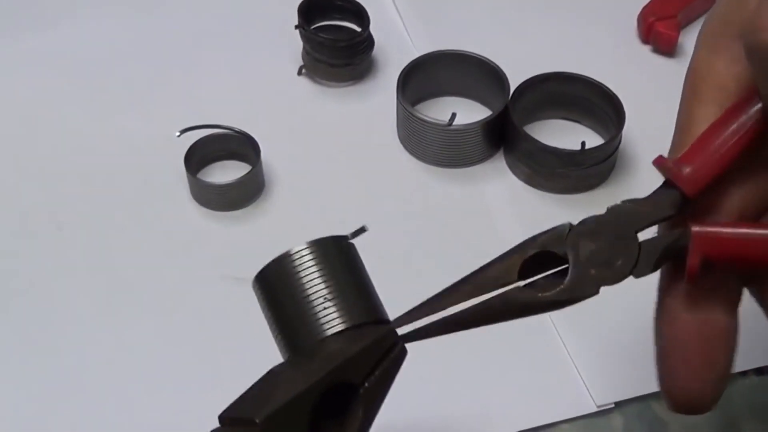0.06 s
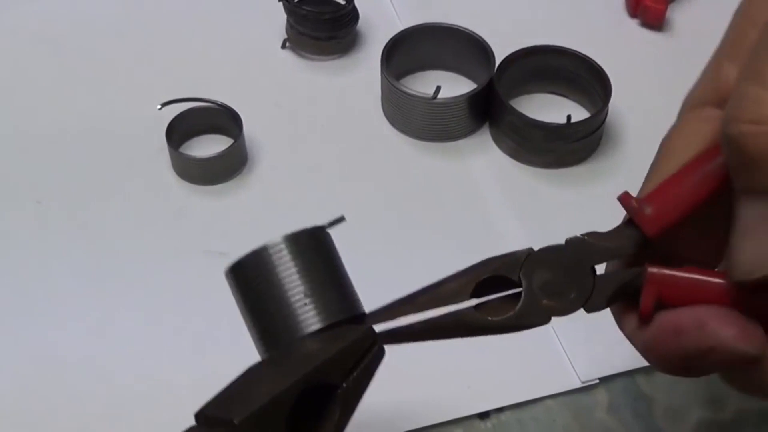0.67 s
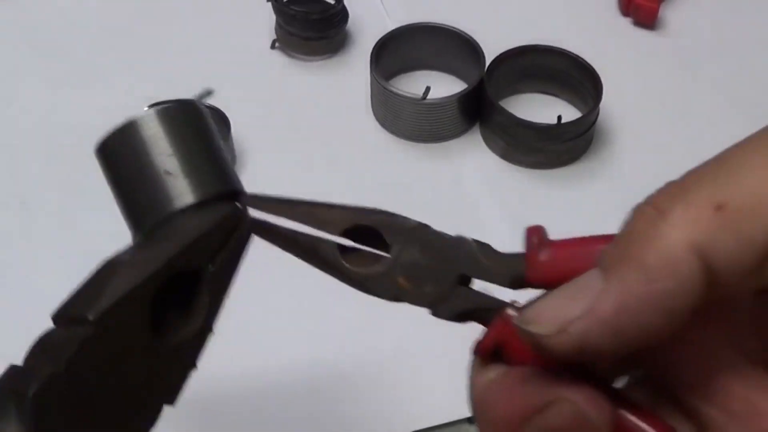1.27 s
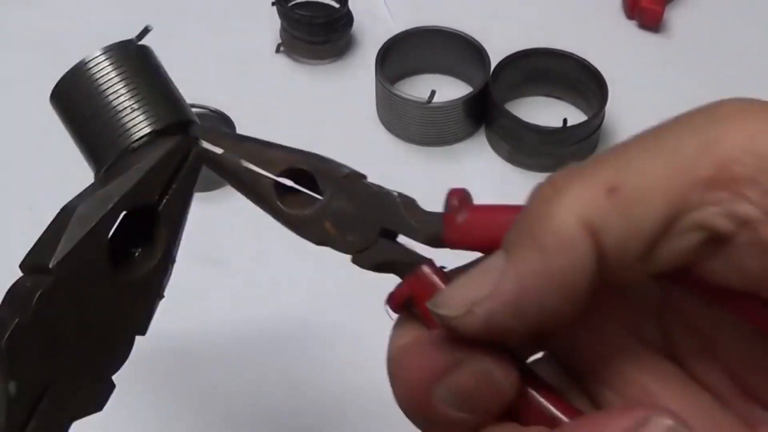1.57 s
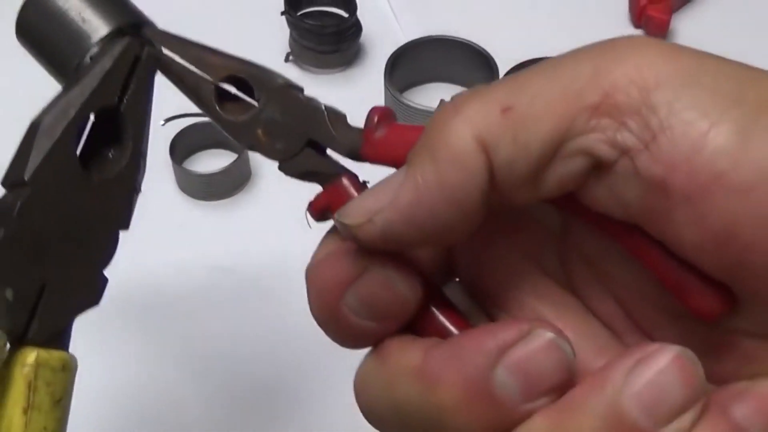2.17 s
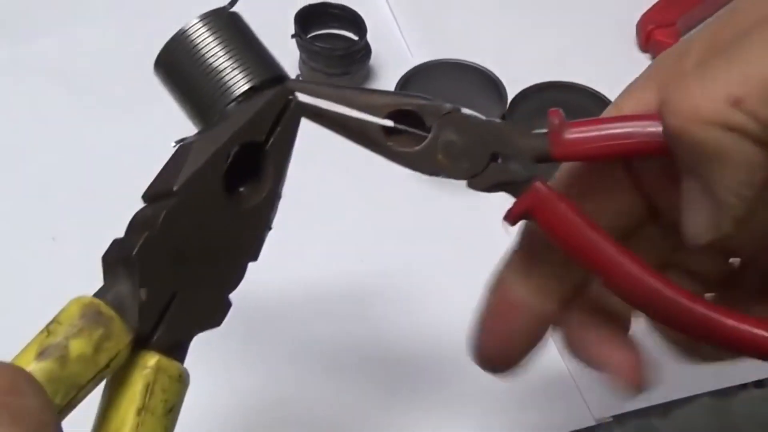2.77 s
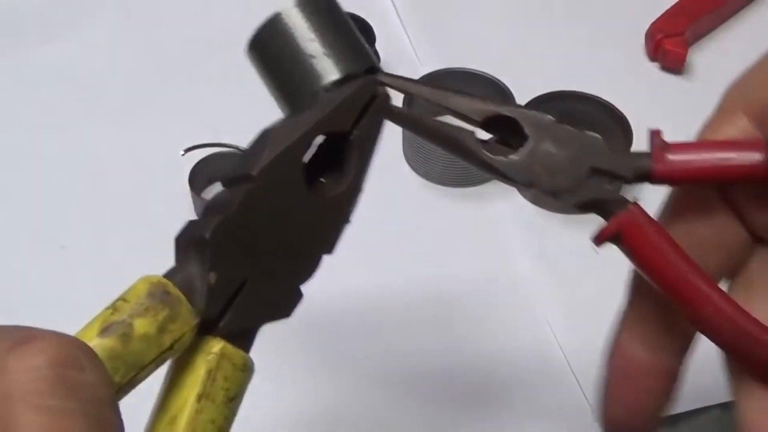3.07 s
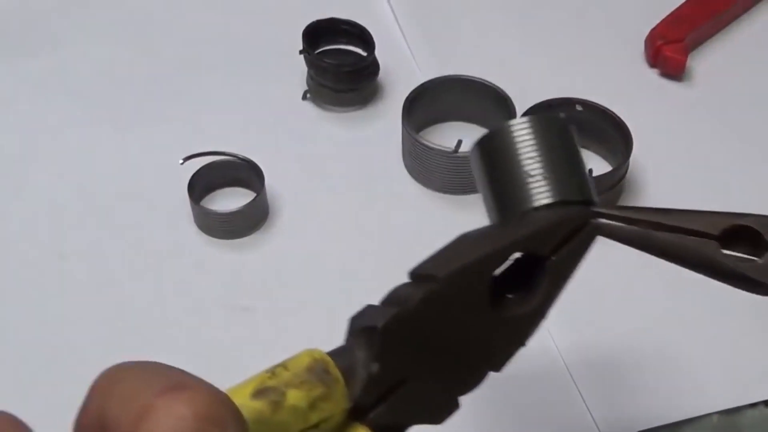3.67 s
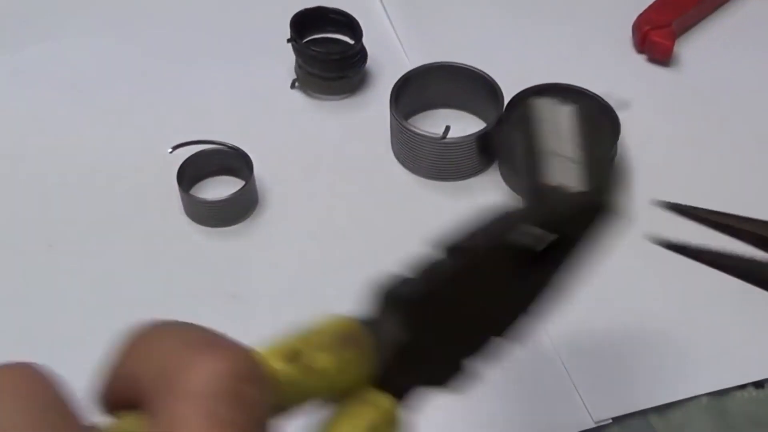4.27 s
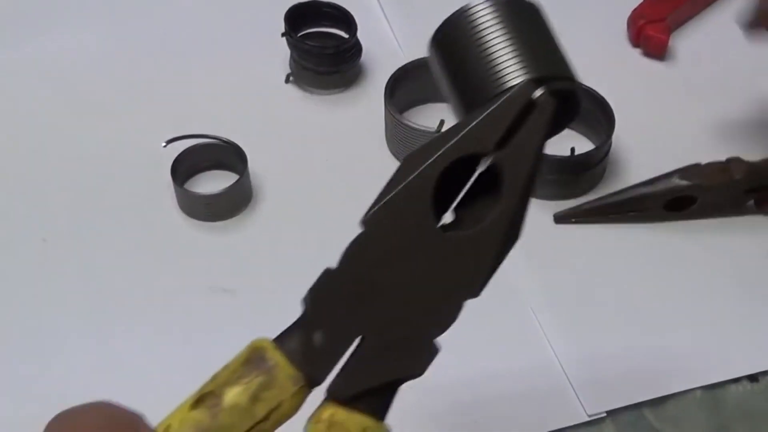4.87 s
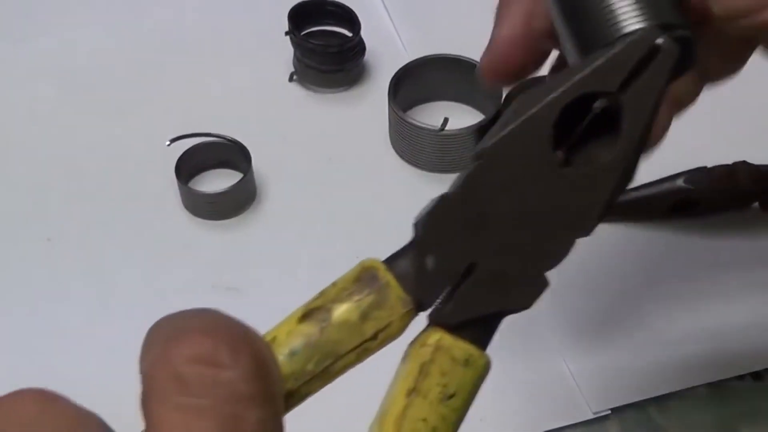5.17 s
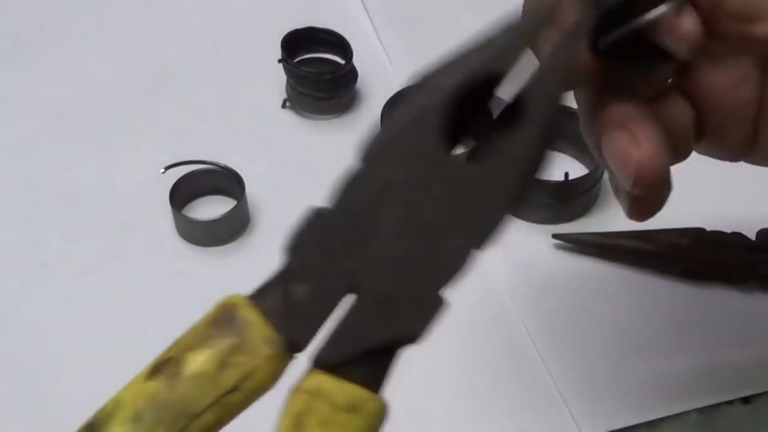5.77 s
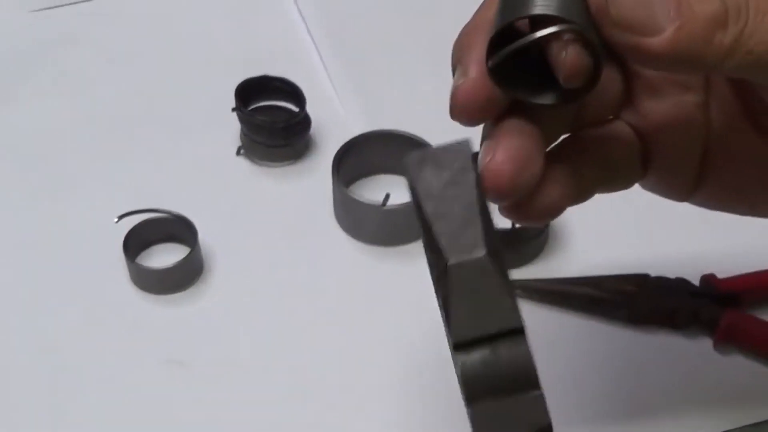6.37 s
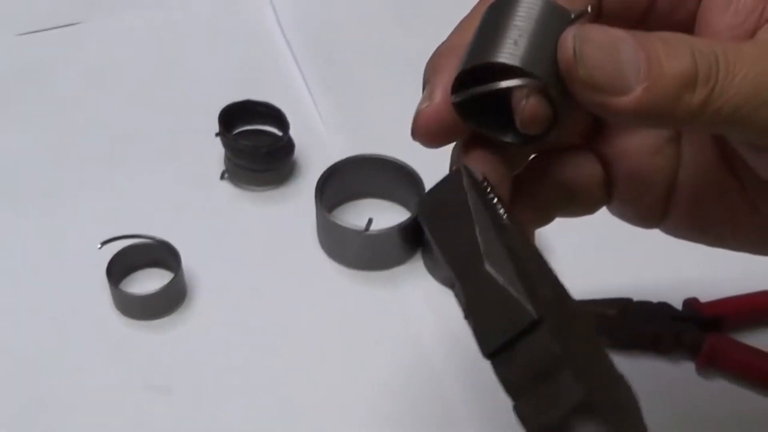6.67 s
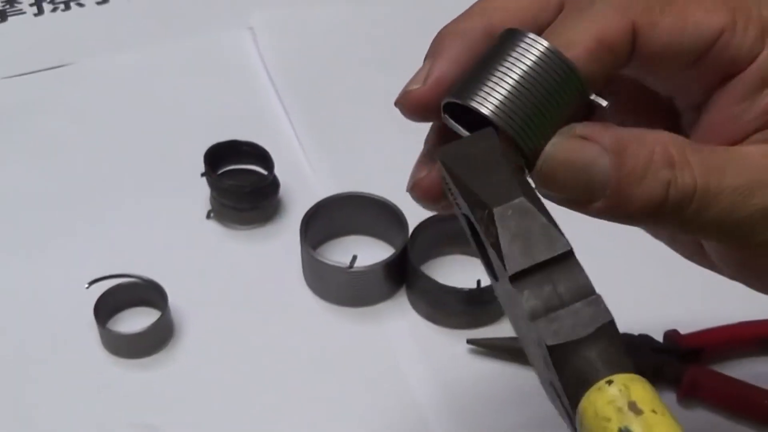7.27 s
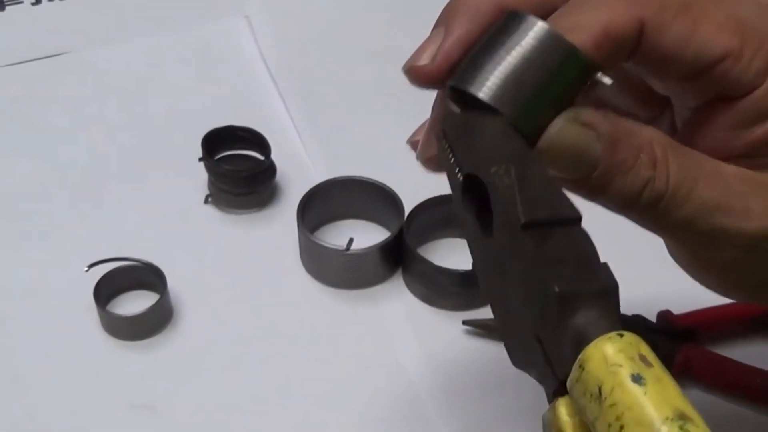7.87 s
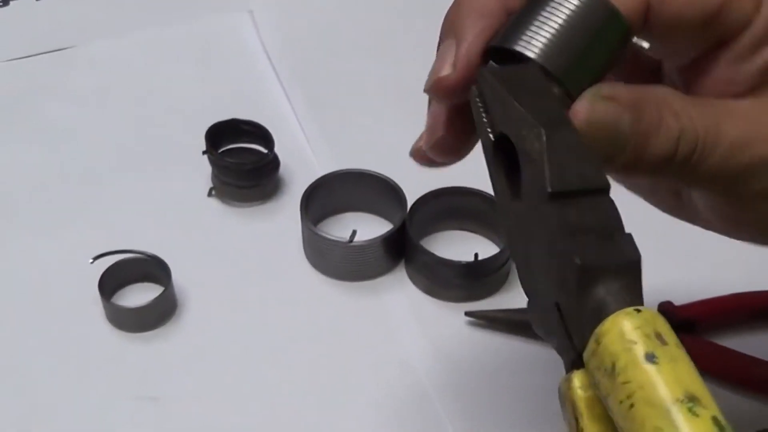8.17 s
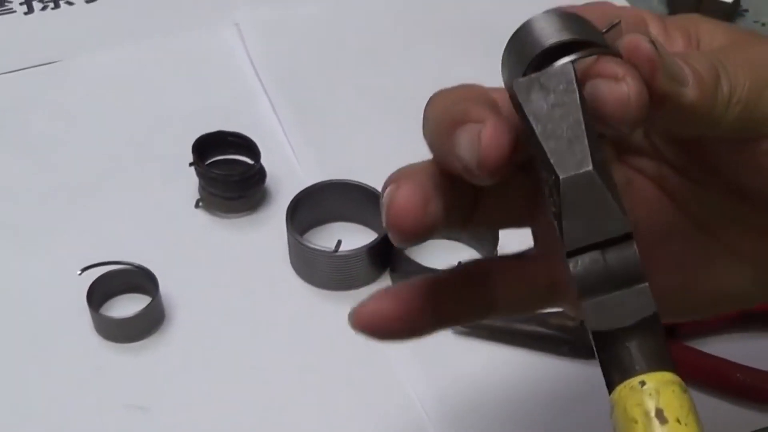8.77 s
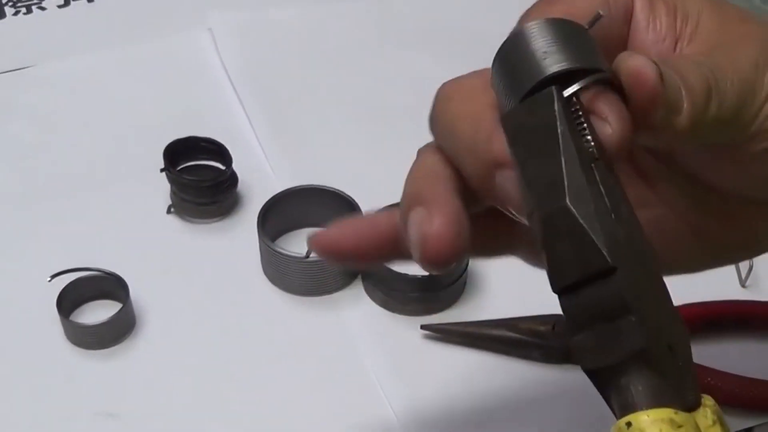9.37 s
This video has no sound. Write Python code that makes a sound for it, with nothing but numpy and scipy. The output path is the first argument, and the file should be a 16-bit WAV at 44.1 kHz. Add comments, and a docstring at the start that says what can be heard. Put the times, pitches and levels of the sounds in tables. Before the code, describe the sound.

Pliers grip and bend the end of a coiled steel spring, heard close in a small room. Tiny squeaky scrapes and a few light metallic clicks open the first second. From about 1 to 2.2 seconds the clicks come thick and irregular, some sharp and doubled, as the wire slips and catches in the jaws. Scattered clicks follow, clearer near 3.1, 3.5 and 4.1 seconds. At 4.4 seconds the jaws skid off with a loud, bright snap and a very short ring from the coil. At about 5 seconds one pair of pliers lands on the workbench with a clattering thump, then knocks again at 5.5. Soft scrapes follow until 6 seconds, then only sparse faint ticks and brief rasps until about 9.5. Quiet, steady room hiss and hum and the faint, high, fluttering whine of a small motor run throughout.

```python
"""Two pairs of pliers grip and bend the end of a coiled steel spring on a workbench. By stick-slip
friction the wire creeps, slips and catches in the jaws; the short clicks and scrapes excite the modes
of jaws and coil, until the jaws skid off. One pair is put down, and its impacts ring the bench top.
Behind it are the steady air of a small room and the faint fluttering whine of a small motor,
probably a camera's."""
import sys
import numpy as np
from scipy import signal
from scipy.fft import rfft, irfft, next_fast_len
from scipy.io import wavfile
from scipy.ndimage import uniform_filter1d

SR = 44100
rng = np.random.default_rng(int(sys.argv[2]) if len(sys.argv) > 2 else 0)


def digitize_waveform(pressure):
    """Quantize a signal to 16-bit integers and store it at the path in sys.argv[1].

    Rows of a 2-D input are taken as channels; values are limited to [-1, 1].
    """
    field = np.atleast_2d(pressure).T
    bounded = np.clip(field, -1, 1)
    quanta = np.round(bounded * 32767).astype(np.int16)
    wavfile.write(sys.argv[1], SR, quanta)


N = 419391
TAPS = 2048  # length of the colouring filters
HZ = np.fft.rfftfreq(TAPS, 1 / SR)

# Spectrum of the room air. Each row: frequency in Hz, relative level in dB.
AIR_SPECTRUM = [(15, -54), (30, -29), (50, -20.5), (100, -21), (150, -20.5), (185, -5.5), (285, -3.5),
                (400, -3.5), (560, -5), (900, -9), (1500, -12), (3000, -15.5), (6000, -21), (14800, -24.5),
                (16000, -30)]
# Coherence of the air between channels. Each row: frequency in Hz, correlation from 0 to 1.
AIR_COHERENCE = [(60, 0.99), (130, 0.99), (290, 0.97), (640, 0.83), (1410, 0.49), (3100, 0.28), (6820, 0.9),
                 (15000, 1.0)]
# Narrow drones. Each row: frequency in Hz, width in Hz, height above the air in dB.
AIR_DRONES = [(60.8, 20, 13), (118, 25, 16), (196, 16, 2), (359, 13, 5), (556.4, 13, 9.5), (650.4, 12, 7.5),
              (884, 23, 7.5), (1213, 29, 6.5)]
# Phase lead of the left channel, for air and bench work. Each row: frequency in Hz, lead in radians.
AIR_PHASE = [(300, 0), (1500, 0.47), (3200, .5), (5000, 0.15), (8000, 0)]
BENCH_PHASE = [(60, .1), (250, 0.23), (500, 0.71), (900, 0.58), (1800, 0.44), (4500, 0.52), (9000, 0.2)]
# Held states of the motor. Each row: start in seconds, pitch in Hz, level in dB.
WHINE_STEPS = [(0, 2570, -73), (1.55, 3280, -72), (3.75, 2570, -75), (5.62, 3290, -70)]
# Steel sliding on steel. Each row: start in seconds, length in seconds, level in dB, squeak pitch
# in Hz, squeak height above the rasp in dB.
SLIDES = [(.277, .04, -52.5, 4420, 19), (.473, 0.047, -48.5, 4390, 19), (.885, 0.057, -61, 5300, 6),
          (1.101, .11, -59.5, 2400, 16), (2.47, 0.051, -59.5, 10830, 11), (2.958, .08, -61.5, 11890, 8),
          (4.104, .1, -63, 6000, 11), (4.821, 0.14, -56, 11460, 9), (5.281, .11, -72, 12400, 17),
          (5.561, .071, -60, 12300, 11), (5.615, .091, -55, 11000, 8), (5.723, .04, -50.5, 5300, 15),
          (5.899, .15, -65, 12400, 13), (7.315, 0.024, -58.5, 4110, 19), (7.501, .022, -58, 4170, 19),
          (8.103, 0.076, -57.5, 12500, 11), (8.343, .038, -60.5, 7460, 14), (8.509, .075, -63.5, 6170, 12),
          (8.67, 0.058, -61.5, 7200, 11), (8.88, .03, -55.5, 4230, 14)]
# Slips of the wire. Each row: start in seconds, level in dB as if spread over 1 ms, chatter decay in
# seconds, body gain in dB, treble gain in dB, favoured resonance in Hz, coil share from 0 to 1,
# delay in seconds until the next tooth catches (0 if none does).
SLIPS = [(.3006, -37, 0.0021, 3, -1, 4430, 0.23, .008), (.4588, -37, .0003, 7, -3, 3320, .6, 0.00005),
         (.6897, -27, .0002, -2, -3.5, 7000, 0.23, 0.000089), (.7605, -36.5, .0003, -2, -5, 4310, 0, 0),
         (.9521, -41, .0005, 7, -3, 5770, 0.04, 0), (.964, -33.5, .0006, 2.5, 1, 5080, 0.54, 0),
         (1.0705, -36, .002, -1, -2, 2500, .3, 0), (1.08, -31, 0.00047, -6, -7, 4330, .1, 0),
         (1.112, -36.5, 0.0022, 0, -2, 2330, .4, 0), (1.131, -29.5, 0.00048, 3, 2, 2800, 0.13, .0045),
         (1.166, -37.5, .0012, 4, 3, 2730, 0, .01), (1.1977, -23.5, 0.00064, 4.5, 5, 3530, 0.18, .0036),
         (1.2675, -42, .0009, -1, 2, 2150, 0, 0), (1.2844, -29.5, 0.0014, 6, 1, 3500, 0.08, 0.0082),
         (1.2944, -22.5, .0006, 2, 2.5, 2250, 0.1, .0035), (1.3615, -27, .001, 4, 5, 2130, .1, 0),
         (1.3678, -25.5, 0.00066, 0, -4, 3420, .03, 0.0016), (1.4265, -39, .0005, 2, -8, 2410, .2, 0),
         (1.4413, -26.5, .0016, 4.5, 0.5, 9200, 0.12, .0068), (1.5154, -40.5, 0.0043, 3, -2, 2130, .2, 0),
         (1.5354, -35.5, .0006, -3, -5, 2500, .05, .0037),
         (1.6038, -22.5, 0.0022, 2.5, 2, 3960, .05, .0028), (1.65, -42, .0005, -4, 3, 8610, .1, 0),
         (1.8403, -40, .0005, -3, 1, 2500, 0.14, 0), (1.8882, -28.5, 0.00054, 0.5, 4.5, 2550, 0.11, 0.0034),
         (2.0041, -45.5, .0004, 7, 6, 8785, 0.14, 0), (2.0568, -45.5, .0004, 3, 7, 2670, 0, 0),
         (2.103, -43, .001, 10, 8, 9300, 0, 0), (2.1186, -36, .0004, 4, 3, 2500, .05, 0),
         (2.1395, -23, .003, 2.5, 3.5, 1900, 0.13, .008), (2.431, -42.5, .0004, 3, 8, 10200, 0.4, 0.00016),
         (2.5175, -41.5, 0.00051, -11, 10, 11900, 0, 0.00015),
         (2.573, -42.5, .0007, 2, -14, 2330, 0.3, 0.00015), (2.8795, -47, .0003, -8, 2, 5340, 0, 0),
         (2.9915, -43.5, .0003, 15, -9, 3360, .3, 0), (3.0556, -27, .0016, 1, -1, 12640, .5, 0.00011),
         (3.0945, -33, 0.0013, 2.5, -5, 2270, .05, 0.00025),
         (3.5153, -25, 0.00089, 0.5, -2, 12240, 0.6, 0.004), (3.595, -30, .0037, 4, -3.5, 11640, .45, 0),
         (3.6715, -41, .0015, 4, -4, 4310, 0.93, 0), (4.0897, -29.5, .0012, -3, 3, 11400, 0.26, 0.00016),
         (4.324, -41, .0005, -8, -5, 9470, .5, 0), (4.4197, -14.5, .0018, -18, -0.5, 11990, .3, 0),
         (4.8217, -42, .0007, 10, 6, 1790, .6, 0), (5.64, -41, 0.00038, -4, 12, 11100, 0, 0),
         (5.9456, -37, .0022, 3, -9, 5405, .5, 0), (6.3393, -43.5, .0008, 2, -5, 2140, .3, 0),
         (7.2135, -37, .0003, 8, -16, 3530, .2, 0), (7.5168, -44.5, .0011, 5, -4, 4130, .3, 0),
         (7.6794, -46, .0014, -7, -3, 11110, .3, 0), (7.978, -43, 0.00073, 9, 4, 7500, 0.13, 0.00031),
         (8.6775, -42.5, 0.0018, -20, -6, 7240, .3, 0.0002),
         (8.917, -36, .0013, 2.5, -1.5, 6370, .45, 0.00063), (9.3586, -44.5, .0013, -3, 1, 5510, .4, .011)]
# Density of faint ticks as the wire twists. Each row: time in seconds, mean ticks per second.
TICK_DENSITY = [(0, 2), (1, 8), (1.7, 5), (2.2, 2), (2.8, 5), (3.6, 4), (4.5, .5), (9.5, .4)]
# Pliers landing on the bench, levels as if spread over 1 ms. Each row: start in seconds, thump level
# in dB, thump centre in Hz, clack level in dB, clack centre in Hz, steel tick level in dB.
LANDINGS = [(4.9706, -9.6, 480, -15, 2660, -30), (4.981, -17.5, 530, -31, 2200, -33.5),
            (5.0257, -39, 450, -19.5, 4630, -18.5), (5.0280, -15.5, 470, -21, 1400, -42),
            (5.0585, -32.5, 300, -30, 4130, -38), (5.458, -36, 700, -37, 1930, -30),
            (5.4625, -11, 766, -11, 1880, -24), (5.4823, -19.5, 664, -37, 1190, -43)]
# Modes of the clamped jaws, the held coil and the bench top. Each row: frequency in Hz, width in Hz,
# relative peak level in dB.
JAW_RESONANCES = [(1130, 590, 2), (2190, 330, 5.5), (2930, 190, 7), (3850, 860, -3.5), (5850, 950, 0),
                  (6400, 270, 4), (8700, 600, 9.5), (10500, 500, 7)]
COIL_MODES = [(1050, 70, -7), (1380, 150, -12), (2720, 160, -5), (3450, 200, -11), (4335, 90, -2),
              (4480, 200, -7), (5900, 260, -3), (6250, 260, -3), (8000, 200, -7), (8950, 350, -5),
              (9900, 260, -4), (10250, 220, -5), (11500, 220, -6), (12220, 260, 0), (12610, 130, -1)]
BENCH_MODES = [(109, 10, -6), (159, 12, -4), (228, 28, -3), (266, 17, 0), (375, 25, 0), (462, 30, -5),
               (533, 22, 0), (642, 35, -5), (748, 40, -10), (810, 35, -7), (1090, 35, -13), (1280, 32, -11)]
# Spectra of the contacts. Each row: frequency in Hz, relative level in dB.
JAW_SPECTRUM = [(60, -25), (160, -10.5), (300, 7), (700, 2.5), (1500, -0.5), (2300, 1.5), (3200, 6.5),
                (4800, 5), (6500, 3.5), (7800, 2.5), (9500, 1.5), (12400, 2), (13800, -1.5), (16000, -14)]
THUD_SPECTRUM = [(40, -43), (70, -9), (105, -6), (160, -6), (260, -5), (420, 2.5), (540, 4.5), (850, -2),
                 (1300, -6.5), (2500, -16.5), (6000, -41), (16000, -66)]
SCRAPE_SPECTRUM = [(500, -2.5), (3000, -3.5), (5000, -1.5), (12000, -1)]
SKID_SPECTRUM = [(3000, -2.5), (4500, 0), (6300, 1), (9500, -2), (12400, 0)]
HANDLE_SPECTRUM = [(60, -25), (300, -6.5), (900, 8.5), (2500, 1), (5000, -1.5), (14000, -36)]
HEAD_SPECTRUM = [(200, -7), (1000, -2), (4500, -2), (9500, 3.5), (12000, -3), (14000, -13)]
COIL_RADIATION = [(700, -18), (1000, 0)]  # the light coil radiates little bass
# Reverberation of the room. Each row: frequency in Hz, time to fall by 60 dB in seconds.
ROOM_T60 = [(150, 0.32), (500, 0.17), (1500, 0.22), (4000, 0.15), (10000, .14), (15000, 0.15)]


def amp(db):
    """Amplitude grows tenfold for every 20 dB."""
    return 10 ** (np.asarray(db) / 20)


def unit(x):
    """Energy is the sum of squares; here it is scaled to one."""
    return x / np.sqrt(np.sum(x ** 2) + 1e-20)


def blow(x, db):
    """Equal energy: x is given that of one millisecond at this level."""
    return amp(db) * np.sqrt(SR / 1000) * unit(x)


def curve(points, hz=HZ):
    """Pitch is logarithmic, so a table is interpolated on a log-frequency axis."""
    frequencies, values = np.transpose(points)
    return np.interp(np.log(hz + 1), np.log(frequencies + 1), values)


def resonance(hz, centre, width):
    """A resonance follows a Lorentzian curve, here of height one."""
    return 1 / (1 + (2 * (hz - centre) / width) ** 2)


def add(mix, start_s, sound):
    """Superposition: a sound adds to the mix from its start time."""
    part = mix[max(round(start_s * SR), 0):][:len(sound)]
    part += sound[:len(part)]


def minimum_phase(db):
    """Minimum phase gives the most compact causal response with this spectral shape."""
    cepstrum = irfft(np.log(amp(db - np.mean(db))))
    return unit(irfft(np.exp(rfft(2 * cepstrum[:TAPS // 2], TAPS))))


def ring(modes, length_s):
    """Damped modes decay at rates set by their widths; neighbours swing in opposite directions."""
    t = np.arange(int(length_s * SR)) / SR
    return unit(sum((-1) ** k * amp(db) * width * np.exp(-np.pi * width * t) * np.sin(2 * np.pi * hz * t)
                    for k, (hz, width, db) in enumerate(modes)))


def room_air(level_db=-56, patchy_db=1):
    """Steady noise with narrow drones forms a field partly coherent between the two channels."""
    frames, hz = N // 1024 + 5, np.fft.rfftfreq(4096, 1 / SR)
    real, imag, other_real, other_imag, patches = rng.standard_normal((5, frames, len(hz)))
    patches = uniform_filter1d(uniform_filter1d(patches, size=3, axis=0), size=30, axis=1)
    coherence = curve(AIR_COHERENCE, hz)
    left = real + 1j * imag
    right = coherence * left + np.sqrt(1 - coherence ** 2) * (other_real + 1j * other_imag)
    drones_db = sum(db * resonance(hz, centre, width) for centre, width, db in AIR_DRONES)
    colour_db = curve(AIR_SPECTRUM, hz) + drones_db + patchy_db * patches / patches.std()
    spectra = np.array([left, right]) * amp(colour_db)
    noise = signal.istft(spectra.swapaxes(1, 2), nperseg=4096, noverlap=3072)[1][:, :N]
    return amp(level_db) * noise / noise.std()


def motor_whine(pips_per_s=29.97, offset_s=.0067, pip_s=.0037, wander=.0055):
    """Amplitude modulation: a small motor's regular pips flutter, switching between two pitches."""
    t, out = np.arange(-TAPS // 4, TAPS // 4) / SR, np.zeros(N)
    switches = [row[0] for row in WHINE_STEPS[1:]]
    for centre_s in np.arange(offset_s + 1 / pips_per_s, N / SR, 1 / pips_per_s):
        _, hz, db = WHINE_STEPS[np.searchsorted(switches, centre_s)]
        hz *= 1 + wander * rng.standard_normal()
        pip = np.exp(-(t / pip_s) ** 2) * np.sin(2 * np.pi * (hz * t + rng.random()))
        add(out, centre_s + t[0], amp(db) * np.sqrt(SR / pips_per_s) * unit(pip))
    return out


def steel(force, colour_db, favoured_hz, coil_share, coil, favour_db, width_hz, uneven_db):
    """Forced vibration: a contact drives jaws and coil, and each grip point favours other modes."""
    uneven = uniform_filter1d(uniform_filter1d(rng.standard_normal(len(HZ)), size=17), size=13)
    grip_db = colour_db + favour_db * resonance(HZ, favoured_hz, width_hz)
    grip_db += uneven_db * uneven / uneven.std()
    grip_db += coil_share * curve(COIL_RADIATION)
    body = np.sqrt(coil_share) * coil
    add(body, 0, np.sqrt(1 - coil_share) * minimum_phase(curve(JAW_SPECTRUM)))
    return signal.fftconvolve(signal.fftconvolve(force, minimum_phase(grip_db)), body)


def contact_force(chatter_s, grit, rise_s=.0001, flattening=.64):
    """A brief force has a broad spectrum: one impulse with a dying chatter of micro-slips."""
    t = np.arange(TAPS // 2) / SR
    envelope = np.exp(-t / chatter_s) * (1 - np.exp(-t / rise_s))
    force = grit * unit(rng.standard_normal(len(t)) * envelope)
    force[round(SR * .0003)] += 1
    power_db = 10 * np.log10(uniform_filter1d(abs(rfft(force, TAPS)) ** 2, size=15) + 1e-9)
    return signal.fftconvolve(force, minimum_phase(-flattening * power_db))[:TAPS]


def scrapes(coil, grain_db=3.5, sharpness=15, coil_share=.12, touch_db=-53.5):
    """Sliding friction: a tick as the steel touches, then dense micro-slips that excite a squeak."""
    out, colour_db = np.zeros(N), curve(SCRAPE_SPECTRUM)
    for start, length, db, hz, squeak_db in SLIDES:
        count = int(length * SR)
        noise, grains = rng.standard_normal((2, SR // 2))[:, :count]
        roughness = amp(grain_db * np.repeat(grains, 64)[:count])
        friction = noise * roughness * signal.windows.tukey(count, .4)
        grip = (colour_db, hz, coil_share, coil, squeak_db, hz / sharpness)
        rasp = steel(friction, *grip, uneven_db=2.5)
        touch = steel(contact_force(.0014, grit=2.7), *grip, uneven_db=2.8)
        add(out, start, amp(db) * np.sqrt(count) * unit(rasp))
        add(out, start, blow(touch, touch_db))
    return out


def clicks(slips, coil, focus, creep_lead_s=.0027, creep_db=-20.5, catch_db=-3.5):
    """Stick-slip: the wire creeps, lets go and may catch again; focus makes resonances stand out."""
    out = np.zeros(N)
    peaks_db = focus * sum(db * resonance(HZ, hz, width) for hz, width, db in JAW_RESONANCES)
    for start, db, chatter_s, body_db, treble_db, hz, coil_share, catch_s in slips:
        stages = [(start - creep_lead_s, db + creep_db, .0015, treble_db),
                  (start, db, chatter_s, treble_db)]
        if catch_s > 0:  # the next tooth gives a weaker, duller blow
            stages.append((start + catch_s, db + catch_db, .0007, treble_db - 2))
        for at, level_db, decay_s, top_db in stages:
            tilt_db = curve([(3000, body_db), (4500, 0), (7500, 0), (9500, top_db)])
            colour_db = tilt_db + (1 - coil_share) * peaks_db
            click = steel(contact_force(decay_s, grit=2.8), colour_db, hz, coil_share * focus, coil,
                          favour_db=9.1 * focus, width_hz=640, uneven_db=3.13 * focus)
            add(out, at, blow(click, level_db))
    return out


def ticks(level_db=-51.5, spread_db=2, chatter_s=.0005, treble_db=3, low_hz=8500, high_hz=12000):
    """A random point process: faint bright slips of the twisted wire, as rows like those of SLIPS."""
    step_s = .01
    times = np.arange(0, N / SR, step_s)
    chance, size, pitch = rng.random((3, len(times)))
    due = chance < np.interp(times, *np.transpose(TICK_DENSITY)) * step_s
    levels = level_db + spread_db * (2 * size - 1)
    pitches = low_hz + pitch * (high_hz - low_hz)
    return [(start, db, chatter_s, 0, treble_db, hz, 0, 0)
            for start, db, hz in zip(times[due], levels[due], pitches[due])]


def skid(coil, end_s=4.418, swell_s=.0072, level_db=-14):
    """Friction swells as the jaws run off the wire, then leaves the coil in free vibration."""
    out, t = np.zeros(N), np.arange(-TAPS // 2, 0) / SR
    friction = rng.standard_normal(len(t)) * np.exp(-(t / swell_s) ** 2)
    ringing = steel(friction, curve(SKID_SPECTRUM), favoured_hz=4344, coil_share=.89, coil=coil,
                    favour_db=8.5, width_hz=380, uneven_db=2)
    add(out, end_s + t[0], blow(ringing, level_db))
    return out


def knocks(focus, ring_db=-2):
    """Impact excites each body: the bench thuds and rings, the handles clack, the steel head ticks."""
    out, head = np.zeros(N), minimum_phase(curve(HEAD_SPECTRUM))
    for start, thump_db, thump_hz, clack_db, clack_hz, tick_db in LANDINGS:
        thud = minimum_phase(curve(THUD_SPECTRUM) + 8 * resonance(HZ, thump_hz, thump_hz))
        clack_peak_db = focus * 17 * resonance(HZ, clack_hz, .62 * clack_hz)
        clack = minimum_phase(curve(HANDLE_SPECTRUM) + clack_peak_db)
        # a blow drives most strongly the modes near its own centre
        bench = ring([(hz, width, db + 7 * resonance(hz, thump_hz, thump_hz))
                      for hz, width, db in BENCH_MODES], length_s=.24)
        parts = [(thud, .0012, .4, thump_db), (bench, .0016, .88, thump_db + ring_db),
                 (clack, .0024, 1, clack_db), (head, .0018, 9.2, tick_db)]
        for body, chatter_s, grit, db in parts:
            add(out, start, blow(signal.fftconvolve(contact_force(chatter_s, grit), body), db))
    return out


def reverberation(x, wet_db, apart, onset_s=.001):
    """Dense reflections decay exponentially in each band and are partly shared by the two channels."""
    t = np.arange(SR // 2) / SR
    shared, left, right = rng.standard_normal((3, len(t)))
    hz, age, spectra = signal.stft(shared + apart * np.array([left, right]), SR, nperseg=256)
    decay = amp(-60 * age / curve(ROOM_T60, hz)[:, None])
    tails = signal.istft(spectra * decay, SR, nperseg=256)[1][:, :len(t)]
    tails *= np.clip(t / onset_s - .5, 0, 1)
    return amp(wet_db) * np.array([signal.fftconvolve(x, unit(tail))[:N] for tail in tails])


def pan(x, balance_db):
    """A level difference, left over right, places a near source."""
    return x * amp([[balance_db / 2], [-balance_db / 2]])


def phase_lead(pair, table):
    """The stereo microphone gives the left channel a slight, frequency-dependent phase lead."""
    size = next_fast_len(N, True)
    turn = np.exp(1j * curve(table, np.fft.rfftfreq(size, 1 / SR)) / 2)
    return irfft(rfft(pair, size) * np.array([turn, 1 / turn]), size)[:, :N]


def scene():
    """Directivity: each mode beams its own way, so direct sound is peakier than the reverberation."""
    coil = ring(COIL_MODES, length_s=.1)
    slips = SLIPS + ticks()
    sliding = scrapes(coil) + skid(coil)
    pliers = pan(clicks(slips, coil, focus=.99) + sliding, balance_db=-.9)
    pliers += reverberation(clicks(slips, coil, focus=.69) + sliding, wet_db=-12, apart=.64)
    bench = pan(knocks(focus=1), balance_db=-1.8)
    bench += reverberation(knocks(focus=.18), wet_db=-7.5, apart=.34)
    # a high-pass filter removes rumble below 95 Hz from the knocks
    bench = signal.sosfilt(signal.butter(3, 95, "highpass", fs=SR, output="sos"), bench)
    return phase_lead(pliers + bench, BENCH_PHASE) + phase_lead(room_air(), AIR_PHASE) + motor_whine()


def record(dry):
    """Band limiting: a low-pass filter removes the treble above 16 kHz."""
    lowpass = signal.firwin(301, 16000, window=("kaiser", 9), fs=SR)
    return signal.oaconvolve(dry, lowpass[None], "same")


dry = scene()
out = record(dry)
digitize_waveform(out)
```